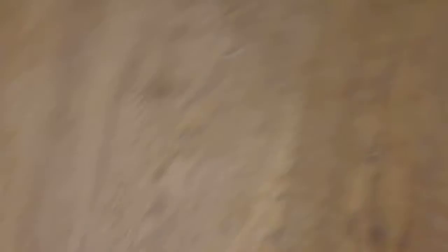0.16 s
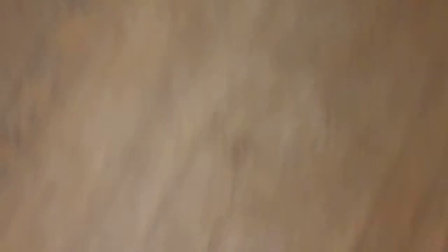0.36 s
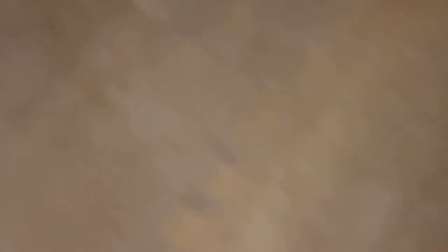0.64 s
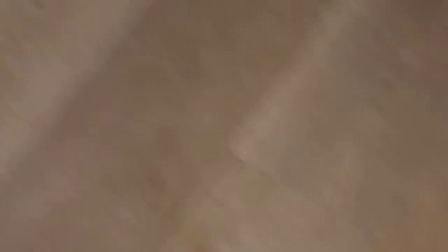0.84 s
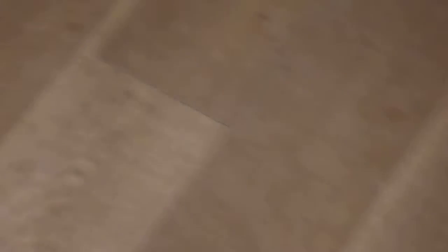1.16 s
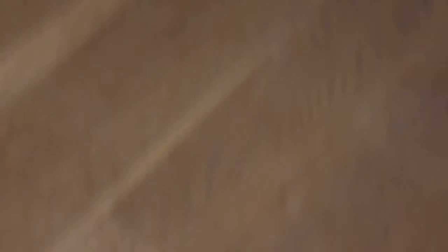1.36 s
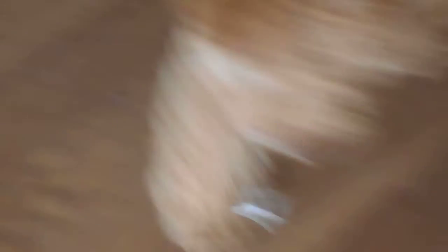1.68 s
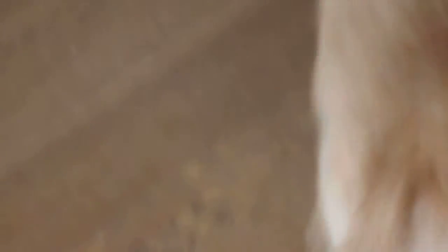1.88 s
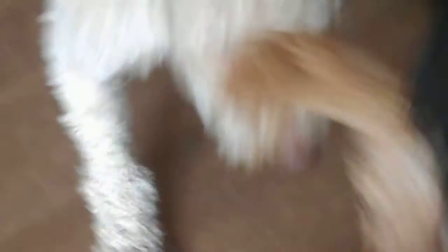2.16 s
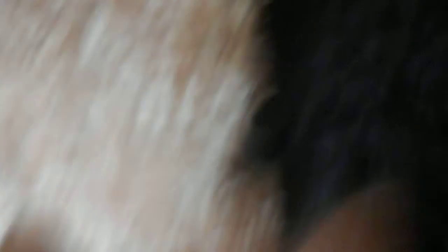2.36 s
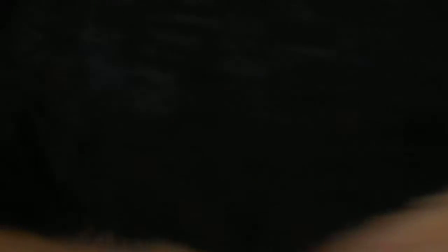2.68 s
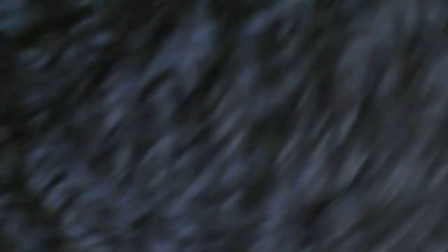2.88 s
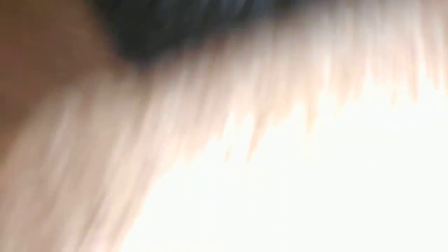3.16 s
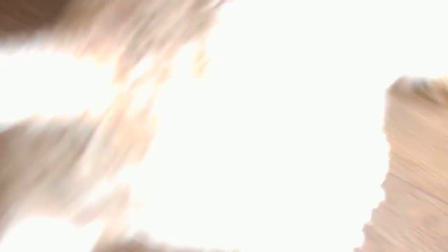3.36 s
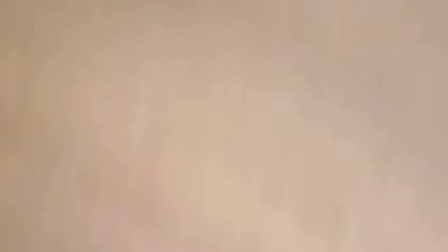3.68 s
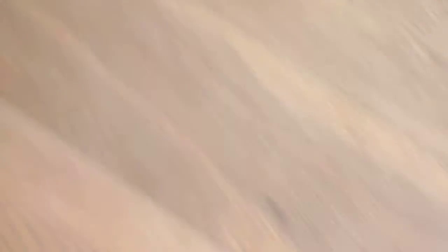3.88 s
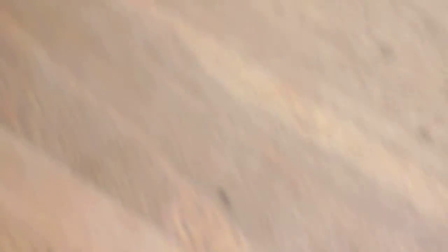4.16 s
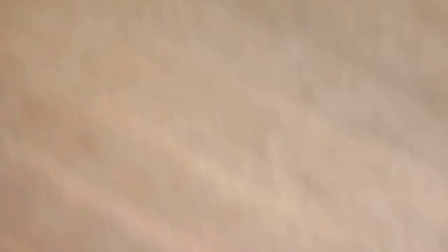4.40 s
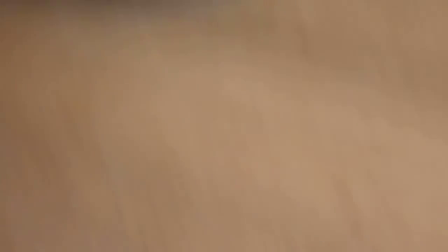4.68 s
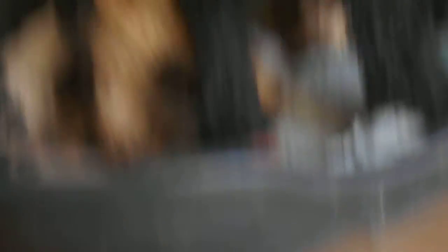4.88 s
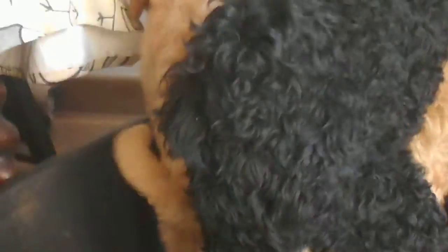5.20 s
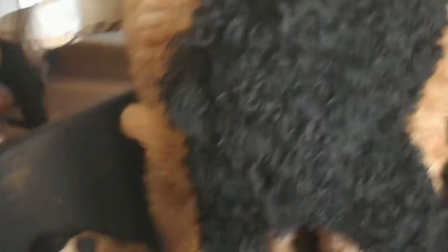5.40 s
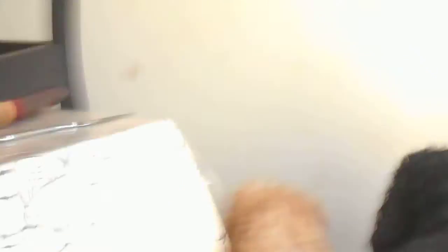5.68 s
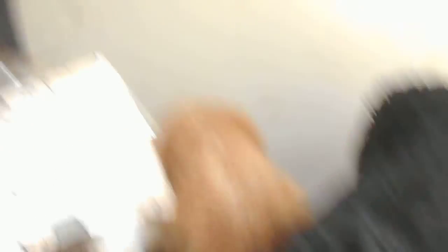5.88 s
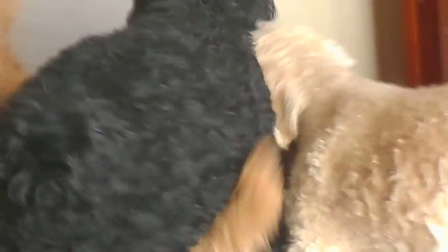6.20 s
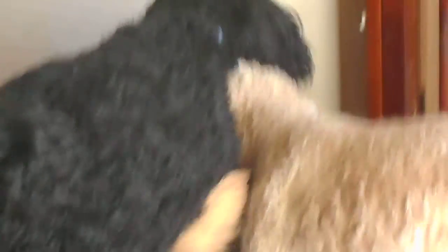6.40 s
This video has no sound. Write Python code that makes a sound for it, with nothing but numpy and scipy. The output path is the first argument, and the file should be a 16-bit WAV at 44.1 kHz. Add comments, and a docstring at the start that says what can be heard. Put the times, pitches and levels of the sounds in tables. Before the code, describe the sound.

Close to a small handheld microphone, curly-coated dogs tussle on a wooden floor. Paws skid and scratch, then claws click sharply in quick irregular bursts amid constant fur rustle. Midway, bodies bump down with dull low thumps, one heaviest. Activity then thins to a few taps, a small wooden knock and faint scuffs in a bare, echoing living room.

```python
"""In a small living room, a puppy and a cat scuffle on a wooden floor close to a hand-held camera.
Impacts (claws, paws, bumps, a knock) and friction (skids, fur, swishes) are force envelopes or noise
passed through resonances; bumps and the knock also excite damped floor modes.
Decaying noise gives the bare room's echo, about half a second long, above the quiet of the house."""
import sys
import numpy as np
from scipy import signal
from scipy.fft import rfft, irfft
from scipy.io import wavfile

SR = 44100
rng = np.random.default_rng(int(sys.argv[2]) if len(sys.argv) > 2 else 0)


def transcribe(signal):
    """Save signal, clipped to [-1, 1], as a 16-bit WAV file at the path in sys.argv[1]."""
    frames = np.atleast_2d(signal).T
    limited = np.clip(frames, -1, 1)
    pcm = np.round(limited * 32767).astype(np.int16)
    wavfile.write(sys.argv[1], SR, pcm)


N = 288546  # length [samples]
T = np.arange(SR // 2) / SR  # time within one event [s]

# paws landing with their claws: (time [s], slap level [dB], slap centre [Hz], slap decay [s], claw level [dB])
PAW_LANDINGS = [(.473, -41, 860, 0.0032, -55), (.493, -34.5, 2770, 0.021, -45),
                (0.5355, -21.5, 3060, 0.0044, -29), (.895, -29.5, 2900, 0.0068, -29),
                (.9645, -28, 2900, 0.0059, -17), (1.5224, -22, 2280, 0.008, -9.5),
                (1.6568, -29.5, 2620, 0.013, -14), (2.0415, -35, 3000, .003, -23.5),
                (2.1222, -27, 3680, .025, -14), (2.160, -21.5, 2820, 0.011, -40),
                (2.5916, -30.5, 3200, .02, -21), (2.721, -20.5, 3200, 0.01, -13),
                (2.926, -25, 3200, 0.0057, -8.5), (3.0868, -25, 2660, .011, -22),
                (3.173, -27.5, 3300, 0.0062, -21), (3.7512, -36, 2700, .005, -18.5),
                (4.0513, -36, 2370, .004, -27), (4.0803, -26, 1260, 0.014, -15),
                (4.952, -46, 1500, 0.032, -52), (5.2948, -28.5, 2230, .007, -28),
                (5.657, -41, 1700, .003, -50), (5.801, -41.5, 1480, 0.013, -46),
                (6.1293, -33.5, 2400, 0.0045, -47)]


def amp(db):
    """Level to amplitude: 20 dB is a factor of ten."""
    return 10 ** (np.asarray(db) / 20)


def unit(x):
    """Normalisation to an rms amplitude of 1."""
    return x / np.sqrt(np.mean(x ** 2))


def add(track, s, x):
    """Superposition: mix x into the track from time s on; a negative time counts as 0."""
    i = max(int(s * SR), 0)
    track[i:i + len(x)] += x[:max(N - i, 0)]


def on_log_hz(hz, points):
    """Interpolation of (frequency [Hz], value) points on a logarithmic frequency axis."""
    f, value = np.transpose(points)
    return np.interp(np.log(np.maximum(hz, 1)), np.log(f), value)


def colour(x, points, size=2048):
    """Minimum-phase filtering: folding the cepstrum makes a (frequency [Hz], level [dB]) response causal."""
    gain = amp(on_log_hz(np.fft.rfftfreq(size, 1 / SR), points))
    cepstrum = irfft(np.log(gain))
    cepstrum[1:size // 2] *= 2
    cepstrum[size // 2 + 1:] = 0
    impulse_response = irfft(np.exp(rfft(cepstrum)))
    return signal.fftconvolve(x, impulse_response)[:len(x)]


def resonate(x, hz, width_hz):
    """Damped resonance: a two-pole band-pass with gain 1 at the centre."""
    g = np.tan(np.pi * min(hz, SR / 3) / SR)
    k = abs(width_hz) / hz
    numerator = [g * k, 0, -g * k]
    denominator = [1 + g * k + g * g, 2 * (g * g - 1), 1 - g * k + g * g]
    return signal.lfilter(numerator, denominator, x)


def grit(n, spread_db, size=16):
    """Friction noise: a dense run of tiny catches, each `size` samples long, a few stronger than the rest."""
    catches = np.minimum(rng.exponential(size=n // size + 1), 2 * np.pi)
    strength = np.repeat(amp(spread_db * catches), size)[:n]
    return unit(rng.standard_normal(n) * strength)


def swell(rise, fall):
    """Contact force: a linear rise [s], then exponential decay; each lasts at least one sample."""
    build_up = np.minimum(T / max(rise, 1 / SR), 1)
    return build_up * np.exp(-np.maximum(T - rise, 0) / max(fall, 1 / SR))


def contact(force, sound):
    """Energy matching: a sound takes the rms amplitude of the force that made it."""
    return unit(sound) * np.sqrt(np.mean(force ** 2))


def rasp(force, hz, width_hz, spread_db, size=16):
    """Rough contact: friction noise drives two equal resonances in series, which steepens the skirts."""
    catches = force * grit(len(T), spread_db, size)
    once = resonate(catches, hz, width_hz)
    return contact(force, resonate(once, hz, width_hz))


def house_air():
    """Background noise: steady random pressure, spectrally shaped, gives the quiet of the house."""
    # spectrum of the quiet: (frequency [Hz], level [dB])
    quiet_spectrum = [(25, -7.5), (35, -19), (50, -12), (90, -13), (170, -13), (300, -11), (600, -8.5),
                      (2000, -17.5), (10000, -28)]
    return amp(-59.5) * unit(colour(rng.standard_normal(N), quiet_spectrum))


def activity_db(s):
    """Amplitude modulation: the interpolated level of the scuffle at time s."""
    # how busy the scuffle is: (time [s], level [dB])
    busyness = [(0.0, -43), (0.89, -37), (1.44, -41), (1.67, -32.5), (2.37, -37.5), (2.57, -38.5),
                (2.71, -32), (2.97, -32.5), (3.35, -39.5), (3.64, -36.5), (4.17, -37), (4.3, -44.5),
                (5.3, -52.5), (5.48, -41), (5.66, -53), (6.14, -57), (6.3, -46), (6.54, -48.5)]
    return np.interp(s, *np.transpose(busyness))


def fur(fur_db=-5, scratch_db=-9, scratches_per_s=70):
    """Distributed friction: coats rub and feet shuffle in uneven pushes, with tiny random scratches."""
    # rustle of the coats: (frequency [Hz], level [dB])
    fur_spectrum = [(100, -33), (300, -7), (600, -1), (1200, -2), (2000, 2), (2800, 0.5), (4500, -1.5),
                    (7000, -2.4), (10000, -7.5)]
    t = np.arange(N) / SR
    knots = np.linspace(0, N / SR, num=200)
    pushes_db = 1.5 * np.interp(t, knots, rng.standard_normal(len(knots)))
    scratches = (rng.random(N) < scratches_per_s / SR) * rng.uniform(-0.73, 1, N)
    rustle = grit(N, spread_db=1.5) + amp(scratch_db) * unit(scratches)
    # the fur level is relative to the activity
    return unit(colour(rustle, fur_spectrum)) * amp(fur_db + activity_db(t) + pushes_db)


def skids(crackle_db=-6.0, crackle_hz=7000, crackle_width_hz=11000, crackle_db_per_octave=3.5):
    """Sliding friction: a hiss swells with the push; bright crackle grows with the width of the contact band."""
    # skids, narrow on pads and wide on claws: (time [s], push [s], level [dB], filter width [Hz])
    slides = [(0, 0.0072, -46, 2000), (.078, 0.0096, -37.5, 3800), (.195, 0.027, -32, 2330),
              (.40, 0.014, -40.5, 2600), (.535, 0.067, -39.5, 2200), (.68, 0.065, -36, 4500),
              (.81, 0.0037, -38, 1300), (.903, 0.011, -37, 4500), (.974, 0.046, -38, 5000),
              (1.069, .011, -36.5, 2600), (1.198, 0.025, -36.5, 5230), (1.29, 0.07, -44, 6000),
              (1.434, 0.015, -39, 4020), (1.478, 0.01, -37.5, 6000), (1.525, 0.018, -26.5, 2400),
              (1.755, .085, -33.5, 2600), (1.92, 0.029, -37.5, 2000), (2.28, 0.031, -37, 6000),
              (2.41, 0.029, -41.5, 8000), (2.539, 0.014, -34, 8000), (2.655, 0.014, -33, 4500),
              (2.729, 0.021, -36, 7500), (2.79, 0.021, -30, 2400), (2.907, .004, -27, 4970),
              (2.941, .05, -31.5, 4000), (3.18, .01, -34.5, 5500), (3.30, 0.028, -35.5, 6300),
              (3.486, 0.0087, -36, 3600), (3.623, .047, -36, 2600), (3.719, 0.035, -36.5, 4000),
              (4.207, 0.031, -33, 8000), (4.498, 0.026, -38.5, 6400), (4.672, 0.071, -40, 6430),
              (5.295, 0.0022, -36.5, 14000), (6.151, 0.034, -39, 7100), (6.311, 0.028, -47, 7000),
              (6.485, 0.015, -45, 7000)]
    grain_hz, fall_s = 2980, 0.053  # the grain of the boards sets the pitch of every skid
    out = np.zeros(N)
    for s, push_s, db, width_hz in slides:
        force = swell(push_s, fall_s)
        hiss = rasp(force, grain_hz, width_hz, spread_db=1.87, size=32)
        catches = force * grit(len(T), spread_db=0.5)
        crackle = contact(force, resonate(catches, crackle_hz, crackle_width_hz))
        crackle_level = crackle_db + crackle_db_per_octave * np.log2(width_hz / grain_hz)
        add(out, s, amp(db) * (hiss + amp(crackle_level) * crackle))
    return out


def pad_catch():
    """Impulsive excitation: a pad catches on the varnish for about a millisecond and rings a narrow band."""
    # one catch: (time [s], level [dB], ring [Hz], filter width [Hz], decay [s])
    # the negative time is played at 0, and the negative decay as one sample
    catch = (-1, -33, 1020, 330, -0.12)
    s, db, hz, width_hz, decay_s = catch
    out = np.zeros(N)
    force = swell(0.00086, decay_s)
    add(out, s, amp(db) * rasp(force, hz, width_hz, spread_db=2.2, size=64))
    return out


def slaps():
    """Extended impact: pads and claws rattle down as a broad noise burst with an exponential decay."""
    width_ratio = 1.83  # filter width over centre frequency
    out = np.zeros(N)
    for s, db, hz, decay_s, _ in PAW_LANDINGS:
        force = swell(0.0012, decay_s)
        add(out, s, amp(db) * rasp(force, hz, width_ratio * hz, spread_db=2.0))
    return out


def stray_ticks(ticks_per_s=3, relative_db=-1, spread_db=11, centre_hz=5500):
    """Poisson process: faint claw ticks at random times follow the activity, as (time, level, ring) rows."""
    chance = rng.random((100, 3))
    times = np.cumsum(-np.log(1 - chance[:, 0])) / ticks_per_s
    levels = activity_db(times) + relative_db + spread_db * (2 * chance[:, 1] - 1)
    rings = centre_hz * 2 ** (chance[:, 2] - .5)  # within half an octave either way
    return [row for row in zip(times, levels, rings) if row[0] < N / SR]


def claws(decay_s=0.0018, ring_width=0.52, crack_db=-5, chatter_db=5):
    """Impact excitation: a sharp blow and brief chatter ring each claw; gives direct sound and room send."""
    # single claws tapping the boards: (time [s], level [dB], ring [Hz])
    taps = [(.536, -17, 3900), (.911, -17.5, 5560), (.977, -21, 4460), (1.348, -28, 4700),
            (1.4745, -19.5, 9350), (1.495, -23, 6500), (1.6536, -21, 5600), (1.6565, -10.5, 5860),
            (1.904, -21, 8500), (2.3456, -24, 8600), (2.5305, -20, 8800), (2.535, -13.5, 7900),
            (2.7173, -10, 7960), (2.7565, -18, 9550), (2.9222, -13, 9050), (3.094, -19.5, 7250),
            (3.177, -16.5, 3200), (3.4256, -29.5, 7400), (3.7805, -22.5, 1870), (3.976, -24.5, 2460),
            (5.2427, -35.5, 4800), (5.295, -20.5, 7050), (5.6602, -21, 6000), (6.099, -31.5, 7500),
            (6.4023, -32, 8340)]
    claw_ratio = 1.9  # a claw rings this many times higher than its paw slaps
    landing_room_db, tap_room_db = -4, -26  # a landing throws more sound into the room than a light tap
    near, send = np.zeros(N), np.zeros(N)
    force = swell(0.00028, decay_s)
    blow = contact(force, signal.unit_impulse(len(T)))
    landings = [(s, claw_db, claw_ratio * hz) for s, _, hz, _, claw_db in PAW_LANDINGS]
    groups = (landings, landing_room_db), (taps, tap_room_db), (stray_ticks(), tap_room_db)
    for rows, room_db in groups:
        for s, db, hz in rows:
            chatter = contact(force, force * rng.standard_normal(len(T)))
            strike = blow + amp(chatter_db) * chatter
            ring = resonate(strike, hz, hz * ring_width)
            crack = resonate(strike, hz * 0.69, hz * 0.86)  # lower and broader than the ring
            tick = amp(db) * contact(force, ring + amp(crack_db) * crack)
            add(near, s, tick)
            add(send, s, amp(room_db) * tick)
    return near, send


def swishes(body_db=-7):
    """Brushing friction: a high band of noise over a weaker, broad one swells slowly and stops fast."""
    # something soft brushes past: (time [s], level [dB])
    brushes = [(1.125, -38), (5.548, -35.5)]
    out = np.zeros(N)
    force = swell(0.066, 0.011)
    for s, db in brushes:
        hiss = rasp(force, hz=7100, width_hz=3700, spread_db=1.5, size=32)
        body = rasp(force, hz=3000, width_hz=6200, spread_db=3.0, size=32)
        add(out, s, amp(db) * (hiss + amp(body_db) * body))
    return out


def floor_ring(rise, boom_lag=2.3):
    """Modal superposition: damped, slightly detuned sines build up over `boom_lag` times the blow's rise."""
    # floor modes: (frequency [Hz], level [dB], time to decay by 60 dB [s])
    floor_modes = [(48, -24, 0.53), (123.6, -17, 0.36), (171.7, 4.5, 0.15), (200.7, -5.5, 0.18),
                   (263.5, -8.5, 0.24), (381, -15, 0.26), (464, -23, 0.13), (550, -19.5, 0.2),
                   (636, -13, 0.14)]
    detune = 1 + 0.011 * rng.standard_normal(len(floor_modes))  # each spot rings a little differently
    ring = np.zeros(len(T))
    for (f, level, t60), d in zip(floor_modes, detune):
        decay = np.exp(-np.log(1000) * T / t60)
        ring += amp(level) * decay * np.sin(2 * np.pi * f * d * T)
    return ring * np.minimum(T / max(boom_lag * rise, 1 / SR), 1)


def bumps(fall_s=0.027, width_ratio=1.23, scuff_db=-13.5, scuff_fall_s=0.064):
    """Soft impact: a body's weight gives a dull thump and a coat scuff, and excites the floor modes."""
    # bodies bumping down: (time [s], rise [s], thump level [dB], thump centre [Hz], floor boom level [dB])
    falls = [(1.523, 0.0068, -39.5, 513, -66), (1.72, 0.053, -47, 610, -68), (2.158, .005, -38.5, 490, -70),
             (2.38, 0.045, -49, 550, -70), (2.51, .012, -41, 580, -66), (2.713, 0.0035, -36.5, 500, -68),
             (2.804, .023, -33.5, 1090, -51), (2.92, 0.0053, -46, 570, -67), (3.086, .006, -39, 605, -62),
             (3.246, 0.01, -41, 420, -42.5), (3.472, .004, -35.5, 640, -38.5),
             (3.53, 0.02, -29.5, 680, -30), (3.786, .015, -23, 338, -15.5),
             (4.082, 0.0031, -25.5, 627, -34.5), (4.16, .035, -39, 650, -49),
             (4.204, 0.0056, -31.5, 240, -28.5), (4.494, 0.011, -42, 520, -47),
             (4.80, 0.034, -55, 420, -52), (4.952, 0.0021, -40.5, 340, -39.5),
             (5.108, 0.012, -58, 420, -45), (5.65, 0.0034, -42, 170, -34.5), (5.801, .003, -47.5, 500, -58),
             (6.106, 0.031, -50.5, 500, -36), (6.16, 0.039, -39.5, 670, -54), (6.275, .012, -47, 480, -39)]
    thumps, boom = np.zeros(N), np.zeros(N)
    for s, rise, db, hz, boom_db in falls:
        thump = rasp(swell(rise, fall_s), hz, width_ratio * hz, spread_db=1.0, size=64)
        scuff = rasp(swell(rise, scuff_fall_s), hz=1400, width_hz=1500, spread_db=0.5)
        add(thumps, s, amp(db) * (thump + amp(scuff_db) * scuff))  # scuff level is relative to the thump
        add(boom, s, amp(boom_db) * floor_ring(rise))
    return thumps, boom


def handling():
    """Structure-borne sound: a shifting hand sends low rumble through the camera body."""
    # the hand shifts: (time [s], rumble level [dB])
    shifts = [(2.78, -55), (3.27, -57), (4.718, -52.5), (5.388, -47), (5.646, -50)]
    out = np.zeros(N)
    for s, db in shifts:
        add(out, s, amp(db) * rasp(swell(0.0049, 0.051), hz=48.3, width_hz=52, spread_db=0))
    return out


def knock(overtone_db=-15, rise_s=0.001):
    """Hollow-body resonance: wood rattles on the floor in a narrow band with a weak octave overtone."""
    # one knock: (time [s], level [dB], ring [Hz], filter width [Hz], decay [s], floor boom level [dB])
    wooden_knock = (5.391, -33, 662, 360, 0.08, -38.5)
    s, db, hz, width_hz, decay_s, boom_db = wooden_knock
    out = np.zeros(N)
    force = swell(rise_s, decay_s)
    ring = rasp(force, hz, width_hz, spread_db=0.0, size=64)
    overtone = rasp(force, 2 * hz, 2 * width_hz, spread_db=7.0, size=64)
    rattle = ring + amp(overtone_db) * overtone
    add(out, s, amp(db) * rattle + amp(boom_db) * floor_ring(0.0077))
    return out


def room_response(gap_s=0.0051, build_s=0.0011):
    """Reverberant decay: after a short gap, uneven random reflections die at a rate set by frequency."""
    # reverberation: (frequency [Hz], time to decay by 60 dB [s])
    decay_times = [(150, 0.47), (600, 0.58), (1500, 0.49), (4000, 0.5), (10000, 0.44)]
    unevenness_db = 2.6 * np.exp(-T / 0.075) * rng.standard_normal(len(T))  # evens out with time
    reflections = rng.standard_normal(len(T)) * amp(unevenness_db)
    hz, t, cells = signal.stft(reflections, SR)
    t60 = on_log_hz(hz, decay_times)[:, None]
    tail = signal.istft(cells * np.exp(-np.log(1000) * t / t60), SR)[1][:len(T)]
    tail *= np.clip((T - gap_s) / build_s, 0, 1)
    return tail / np.sqrt(np.sum(tail ** 2))


def room(x):
    """Time-varying reverberation: animals and camera move, so each half second has its own reflections."""
    # tone of the echo: (frequency [Hz], level [dB])
    echo_spectrum = [(100, 2.5), (300, 1), (600, 6.5), (1200, 0.5), (2600, 1.5), (4500, 1.5), (7000, 1),
                     (10000, 3)]
    out = np.zeros(N)
    fade = np.sqrt(np.hanning(len(T)))  # half-overlapping windows keep the power steady
    for i in range(0, N, len(T) // 2):
        part = x[i:i + len(T)]
        add(out, i / SR, signal.fftconvolve(part * fade[:len(part)], room_response()))
    return colour(out, echo_spectrum)


def scene():
    """Superposition of all contacts, their echo in the room and the quiet of the house."""
    air = house_air()
    scrapes = fur() + skids() + pad_catch() + swishes()
    paws = slaps()
    ticks, tick_send = claws()
    thumps, boom = bumps()
    rumble = handling()
    thumps = thumps + knock()
    impact_send = tick_send + amp(1.5) * paws + amp(-5.5) * thumps + amp(-7) * boom
    echo = room(impact_send + amp(-12.0) * scrapes)
    direct = ticks + paws + amp(0.92) * scrapes + amp(3.0) * thumps + boom
    return (direct + echo + rumble + air)[None]


def record(dry):
    """Transducer response: the small microphone colours the sound, and a steep low-pass removes the top."""
    # microphone: (frequency [Hz], level [dB])
    mic_response = [(50, 4.5), (500, -0.5), (1300, 2), (2800, 1), (3400, -0.5), (4300, 0.46), (5500, -1),
                    (8000, -0.5), (10200, 2), (11000, -12), (12000, -17.5)]
    low_pass = signal.ellip(8, .2, 70, 12200, fs=SR, output="sos")  # order, ripple [dB], stop [dB], edge [Hz]
    return signal.sosfilt(low_pass, colour(dry[0], mic_response))[None]


dry = scene()
out = record(dry)
transcribe(out)
```